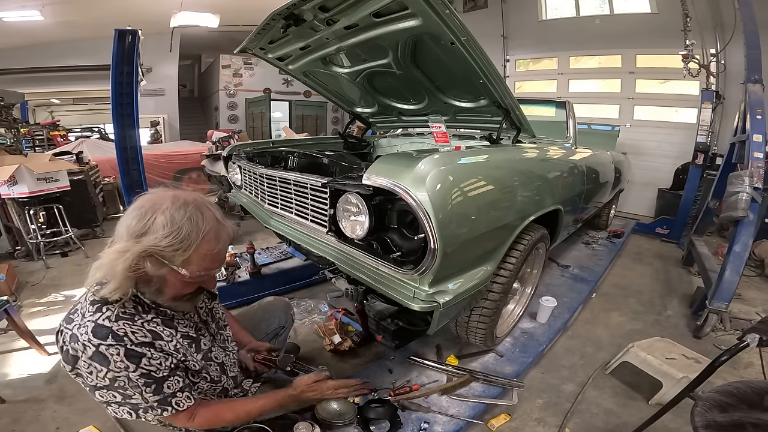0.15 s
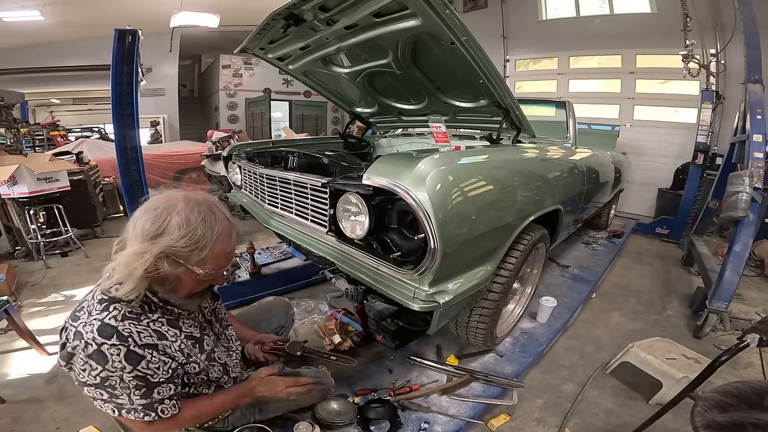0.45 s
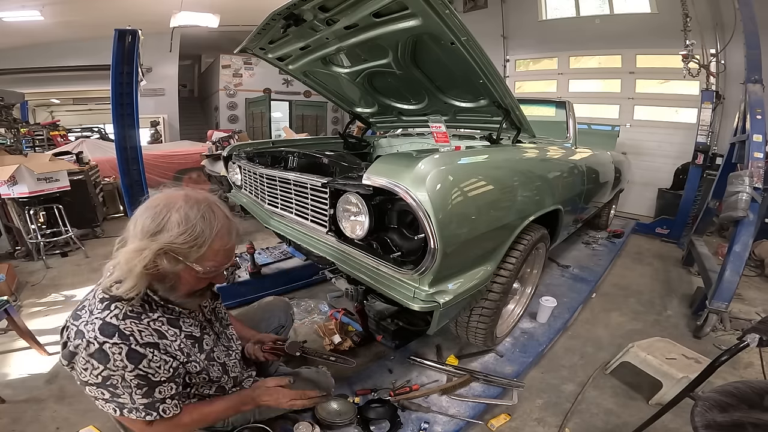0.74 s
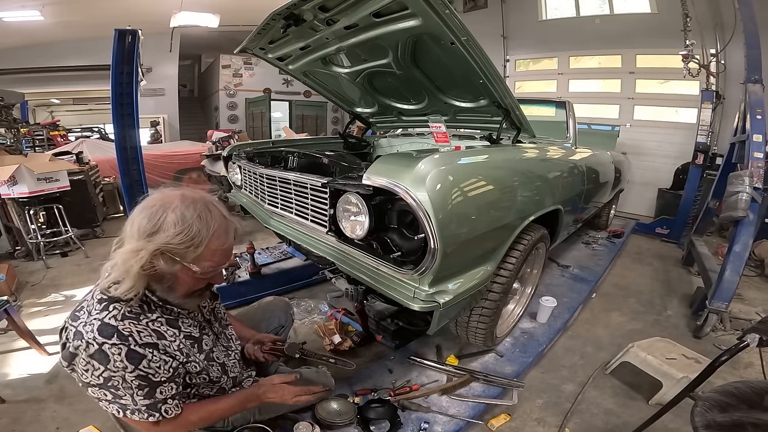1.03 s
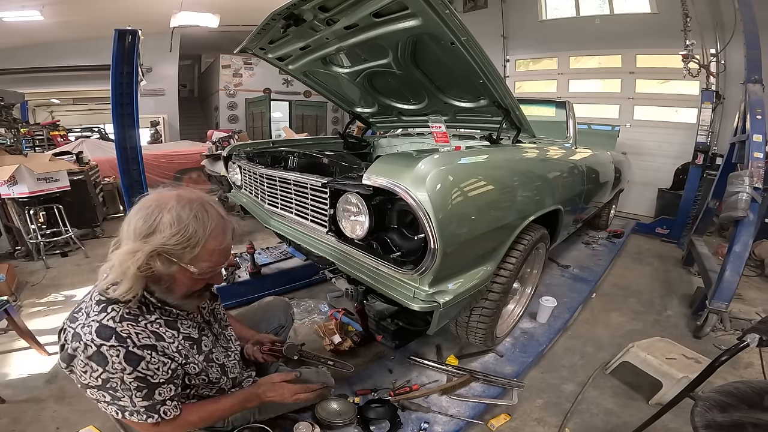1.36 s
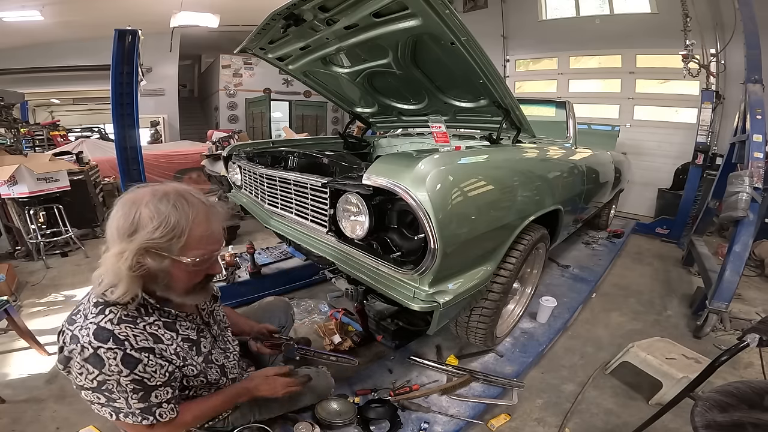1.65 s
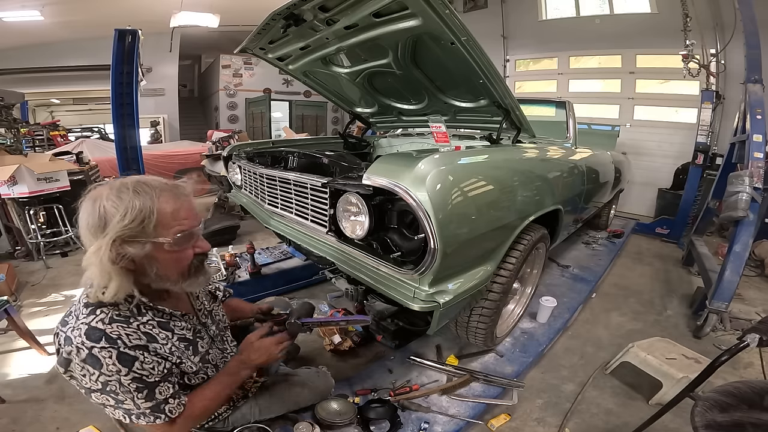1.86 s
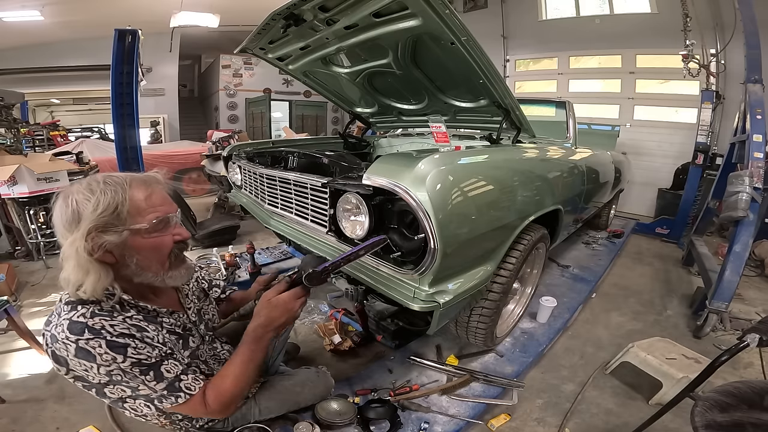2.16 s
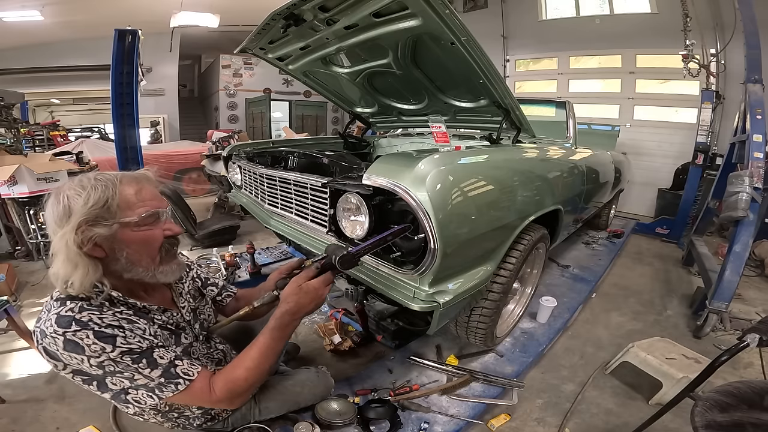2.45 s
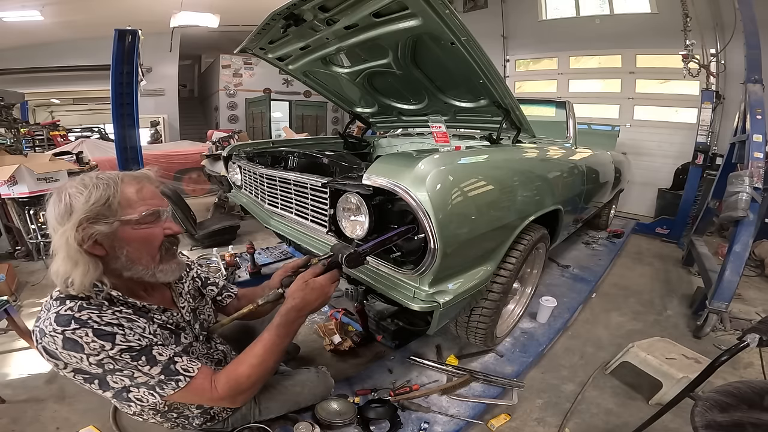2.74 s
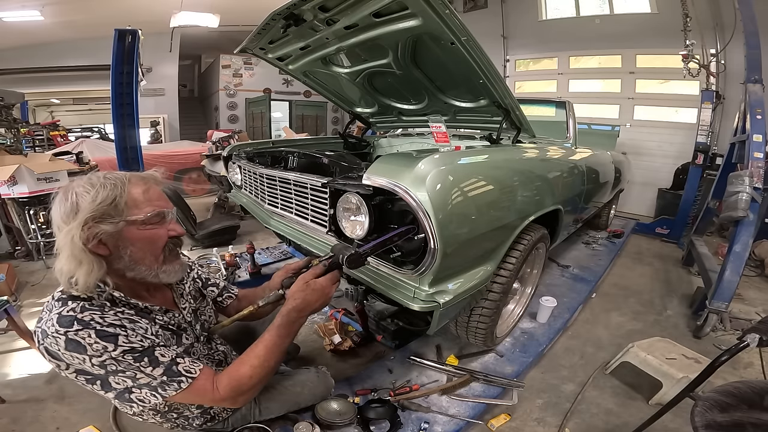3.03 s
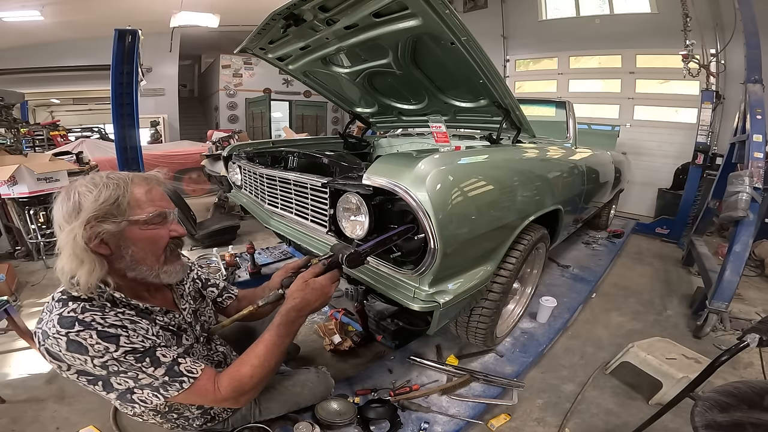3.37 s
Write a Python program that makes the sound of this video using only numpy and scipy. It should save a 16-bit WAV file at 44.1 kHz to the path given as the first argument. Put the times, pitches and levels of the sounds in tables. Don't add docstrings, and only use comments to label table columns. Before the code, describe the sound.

Air tool blipped in quick buzzing whines, a pause with thuds, then more bursts and a brief metallic scrape.

```python
import sys
import numpy as np
from scipy import signal
from scipy.fft import rfft, irfft, next_fast_len
from scipy.io import wavfile
from scipy.ndimage import map_coordinates

SR = 44100
rng = np.random.default_rng(int(sys.argv[2]) if len(sys.argv) > 2 else 0)


def dump_mix(stems):
    frames = np.atleast_2d(stems).T
    limited = np.clip(frames, -1, 1)
    pcm = np.round(limited * 32767).astype(np.int16)
    wavfile.write(sys.argv[1], SR, pcm)


def ratio(d):
    e = np.asarray(d, float) / 20
    return 10 ** e


N = 154350

# air starts in seconds, puffs start in seconds, valve shuts in seconds,
# puff level in dB, air level in dB.
SQUEEZES = [
    (0.62, 0.618, 0.78, -17.5, -30.5),
    (1.001, 1.007, 1.113, -19, -36),
    (1.182, 1.198, 1.32, -19, -34.5),
    (1.396, 1.398, 1.526, -19, -34),
    (2.963, 2.99, 3.124, -20, -31.5),
    (3.199, 3.192, 3.356, -20, -33.5),
    (3.447, 3.469, 3.83, -27.5, -38.5),
]


def unit(x):
    return x / np.sqrt(np.mean(x ** 2) + 1e-20)


def along(points, hz):
    f, v = np.transpose(points)
    return np.interp(np.log(hz + 1), np.log(f + 1), v)


def wobble(rate):
    return map_coordinates(rng.standard_normal(int(N * rate / SR) + 4), [np.arange(N) * rate / SR])


def filtered(x, response):
    m = next_fast_len(N + SR // 2)
    return irfft(rfft(x, m) * response(np.fft.rfftfreq(m, 1 / SR)), m)[..., :N]


def noise(spectrum):
    return unit(filtered(rng.standard_normal(N), lambda hz: ratio(along(spectrum, hz))))


def since(s):
    return np.maximum(np.arange(N) / SR - s, 0)


def resonances(table):
    def response(f):
        total = 0
        for k, (centre, width, db) in enumerate(table):
            damping = 1j * f * width
            total = total + (-1) ** k * ratio(db) * damping / (centre ** 2 - f * f + damping)
        return total
    return response


def dips(table):
    def response(f):
        cuts = [1 - depth * resonances([(centre, width, 0)])(f) for centre, width, depth in table]
        return np.prod(cuts, axis=0)
    return response


def hum():
    # frequency in Hz, level in dB.
    hum_tones = [
        (118.4, -58),
        (296.1, -69.5),
    ]
    t = np.arange(N) / SR
    return sum(ratio(db - 1.5 + 0.44 * wobble(7.64)) * np.sin(2 * np.pi * hz * t) for hz, db in hum_tones)


def room_air():
    # frequency in Hz, level in dB per Hz.
    air_spectrum = [(18, -59), (30, -33), (48, 7.5), (123, 1), (1190, -21), (2990, -23.5), (4880, -29.5),
                    (11700, -47), (14000, -45)]
    # time in seconds, level in dB.
    swell = [(0, -5.5), (.6, -5.5), (2.1, -3), (2.3, 1.5), (3.5, -1.5)]
    # centre in Hz, width in Hz, level in dB.
    whistles = [(1670, 200, 4.5), (3020, 67, 8.5), (3750, 150, 6.5), (6450, 120, -1.5)]
    level_db = -54 + np.interp(np.arange(N) / SR, *np.transpose(swell)) + 0.5 * wobble(6.7)
    return ratio(level_db) * filtered(noise(air_spectrum), lambda f: 1 + abs(resonances(whistles)(f)))


def fading_hiss():
    # frequency in Hz, level in dB per Hz.
    hiss_spectrum = [(88, -44), (150, -13), (275, -2.5), (467, -14.5), (532, -7), (2620, -4), (4220, -5.5),
                     (12000, -42), (15600, -59), (22000, -120)]
    level_db, t60_s = -41, 1.11
    return ratio(level_db - 60 * since(0) / t60_s + 1.3 * wobble(40.7)) * noise(hiss_spectrum)


def thuds():
    # start in seconds, low level in dB, scuff level in dB, body tone in Hz.
    knocks = [(0.231, -58, -50, 280), (0.294, -68, -48, 294), (2.586, -47, -48, 240),
              (2.611, -40.5, -70, 175), (2.687, -32.5, -53, 148.6), (2.699, -31, -50, 312.1),
              (2.712, -24.5, -47.5, 223), (2.753, -41.5, -56.5, 360), (2.761, -35, -54, 224.7),
              (2.813, -33.5, -55, 224), (2.87, -43, -57, 332.5), (2.932, -43.5, -57, 214.8)]
    # frequency in Hz, level in dB per Hz.
    rumble_spectrum = [(29, -51), (50, -2), (177, -16), (222, -0.5), (272, -17), (508, -16), (1000, -32.5),
                       (1300, -59), (2200, -120)]
    scuff_spectrum = [(180, -14), (300, -0.5), (499, -22), (684, -8.5), (3060, -16), (7000, -37),
                      (10400, -73), (17600, -120)]
    body_t60_s, rumble_t60_s, scuff_t60_s = 0.22, 0.53, 0.31
    rise_s = 0.0038
    out = np.zeros(N)
    for start, low_db, scuff_db, body_hz in knocks:
        t = since(start)
        body = ratio(6 - 60 * t / body_t60_s) * np.sin(2 * np.pi * body_hz * t)
        rumble = ratio(-3 - 60 * t / rumble_t60_s) * noise(rumble_spectrum)
        scuff = ratio(scuff_db - 60 * t / scuff_t60_s + 2.3 * wobble(80)) * noise(scuff_spectrum)
        out += ratio(low_db) * (body + rumble) * (1 - np.exp(-t / rise_s)) + scuff * (t > 0)
    return out


def scrape():
    # start in seconds, length in seconds, level in dB.
    touches = [
        (3.358, 0.03, -36.5),
        (3.44, .03, -29.5),
        (3.471, .05, -30.5),
    ]
    # frequency in Hz, width in Hz, level in dB.
    panel = [(2677, 26, -9), (3110, 49, -4), (3980, 38, -4), (4670, 34, 0.5), (5260, 14, 6.5),
             (5370, 23, 3), (6700, 38, -8.5), (7440, 54, -6), (8410, 55, -37), (11540, 60, -19),
             (12500, 80, -22)]
    rise_s, release_t60_s = 0.017, 0.077
    touch = np.zeros(N)
    for start, length, db in touches:
        release = ratio(-60 * since(start + length) / release_t60_s)
        touch += ratio(db) * np.clip(since(start) / rise_s, 0, 1) * release
    grit = rng.standard_normal(N) * ratio(4.7 * wobble(400))
    ringing = ratio(17.5) * filtered(touch * grit, resonances(panel))
    rasp = noise([(2000, -34), (5000, 9), (7800, -22.0), (9000, -14), (11000, -5), (14000, -27)])
    return ringing + ratio(-6.5) * touch * rasp


def valve():
    # time in seconds, crack level in dB, ring level in dB, knock level in dB.
    clicks = [(0.617, -30, -23, -32.5), (.637, -28, -53, -15.5), (.65, -22, -52, -15),
              (1.0, -28.5, -37, -28), (1.021, -25.5, -25, -18), (1.183, -25, -47, -27),
              (1.2, -29, -30, -18), (1.4095, -42, -35, -43), (2.968, -19, -22.5, -33.5),
              (2.991, -17, -36, -19.5), (3.001, -15.5, -40.5, -45), (3.017, -19.5, -48, -20.5),
              (3.195, -25, -40, -30), (3.3624, -24, -28, -36), (3.483, -21, -49, -29)]
    # frequency in Hz, level in dB per Hz.
    crack_spectrum = [(300, -15), (1000, 0), (2500, 2), (4200, -0.5), (9000, -48.5)]
    ring_hz, knock_hz = 2033, 270.4
    crack_t60_s, ring_t60_s, knock_t60_s = 0.026, 0.048, 0.065
    out = np.zeros(N)
    for start, crack_db, ring_db, knock_db in clicks:
        t = since(start)
        out += (t > 0) * ratio(crack_db - 60 * t / crack_t60_s) * noise(crack_spectrum)
        out += ratio(ring_db - 60 * t / ring_t60_s) * np.sin(2 * np.pi * ring_hz * t)
        out += ratio(knock_db - 60 * t / knock_t60_s) * np.sin(2 * np.pi * knock_hz * t)
    return out


def spin(start, closing, length, free_hz, lag):
    shut = since(closing) / length
    if length < 0.05:
        shut = (1.5 * shut) ** 3
    push = np.clip(since(start) / 0.01, 0, 1) * np.clip(1 - shut, 0, 1)
    keep = np.exp(-1 / (lag * SR))
    return signal.lfilter([1 - keep], [1, -keep], free_hz * push)


def vane_rate():
    # push starts in seconds, closing starts in seconds, closing time in seconds,
    # free vane rate in Hz, rotor lag in seconds.
    spins = [
        (0.6404, 0.7184, 0.057, 1093, 0.054),
        (1.01, 1.0887, 0.026, 644.2, 0.054),
        (1.1851, 1.2973, 0.0416, 637.6, 0.0518),
        (1.39, 1.504, 0.03, 613.5, 0.05),
        (2.9948, 3.1188, 0.03, 585.3, 0.038),
        (3.1883, 3.3459, 0.0344, 579.6, 0.0362),
        (3.2683, 3.3148, 0.04, 153.6, 0.032),
        (3.477, 3.6, 0.02, 609.5, 0.036),
    ]
    *pushes, deeper, last = [spin(*row) for row in spins]
    rate = np.max(pushes + [last], axis=0) + deeper
    return rate * (1 + 0.0048 * wobble(150))


def exhaust(rate, turn):
    # centre in Hz, width in Hz, level in dB.
    pipe_far = [(123, 65, -9), (296, 124, 3.5), (405, 168, 4), (592, 290, 0.5), (928, 88, 5),
                (1158, 203, -0.5), (1683, 196, 0), (2150, 160, -8), (2360, 136, -4.5), (3400, 750, -15)]
    pipe_near = [(126, 126, 0), (280, 140, 4.5), (404, 152, 5), (645, 156, 1), (876, 91, 4), (1120, 230, 0),
                 (1620, 320, 2), (2060, 150, -5), (2260, 140, 1), (2640, 380, -1), (3360, 660, -6.5),
                 (4100, 170, -4.5)]
    # centre in Hz, width in Hz, depth from 0 to 1.
    dips_far = [(360, 28.6, 0.82), (510, 32, 0.83), (773, 135, 0.78)]
    dips_near = [(320, 46, 0.59), (535, 86, 1), (720, 130, 0.51)]
    # frequency in Hz, width in Hz, level in dB.
    shell = [(861, 9.3, -3), (1660, 12, -19)]
    # time in seconds, level in dB, half length in seconds.
    chuffs = [
        (.772, 1.5, 0.0064),
        (0.789, 7.5, 0.0054),
        (1.13, 3, .012),
        (1.328, 4, 0.0072),
        (1.527, 4, 0.0062),
        (3.141, 10, 0.0088),
        (3.368, 11, .005),
        (3.378, 12.5, 0.0058),
    ]
    rise_s, coast_t60_s, moved_s = 0.025, 0.17, 2.2
    t = np.arange(N) / SR
    flow = np.zeros(N)
    for _, start, shut, db, _ in SQUEEZES:
        flow += ratio(db - 60 * since(shut) / coast_t60_s) * np.clip(since(start) / rise_s, 0, 1)
    bark_db = sum(db * np.exp(-((t - s) / half) ** 2) for s, db, half in chuffs)

    train = np.zeros(N)
    for k in range(1, 30):
        order_db = -4.5 * np.log2(k) + 2.5 * (k == 2) + 2.5 * wobble(45)
        if k > 1:
            order_db = order_db + bark_db
        else:
            order_db = order_db - 0.96 * bark_db * (t < moved_s)
        fade_at_top = np.clip(8 - k * rate / 1000, 0, 1)
        train += ratio(order_db) * np.cos(2 * np.pi * k * turn) * fade_at_top
    train *= np.clip(rate / 150, 0, 1)

    puff_size = ratio(rng.standard_normal(4000))[(turn + 0.5).astype(int)]
    puffs = ratio(1) * flow * puff_size * train

    def muffler(pipe, echo):
        return lambda f: resonances(pipe)(f) * dips(echo)(f) + resonances(shell)(f)

    before = filtered(puffs * (t < moved_s), muffler(pipe_far, dips_far))
    after = filtered(puffs * (t >= moved_s), muffler(pipe_near, dips_near))
    return before + after


def air_rush(turn):
    # frequency in Hz, level in dB per Hz.
    rush_spectrum = [(300, -4), (900, -10), (2000, -3.5), (3000, -12.5), (4200, -5.5), (4600, -13.5),
                     (7800, -21), (9000, -66)]
    fizz_spectrum = [(4710, -18), (8000, -9), (9050, -5.5), (10100, -4), (11900, -6.5), (14300, -23)]
    # centre in Hz, width in Hz, level in dB.
    housing = [(850, 41, 2), (1680, 95, -10), (2034, 80, 7), (2300, 230, -1), (2450, 42, 15),
               (3060, 180, 6), (3580, 40, 9.5), (3830, 190, -4.5), (4160, 54, -3.5), (5020, 160, 4)]
    rise_s, t60_s, sag_db_per_s = 0.019, 0.32, 9.5
    flow = np.zeros(N)
    for start, _, shut, _, db in SQUEEZES:
        level_db = db - 60 * since(shut) / t60_s - sag_db_per_s * since(start)
        flow += ratio(level_db) * np.clip(since(start) / rise_s, 0, 1)
    chopped = flow * (1 + 0.11 * np.cos(2 * np.pi * turn)) * ratio(2.5 * wobble(60))
    rush = filtered(noise(rush_spectrum), lambda f: 1 + abs(resonances(housing)(f)))
    return chopped * (ratio(-1) * rush + ratio(-20) * noise(fizz_spectrum))


def motor():
    rate = vane_rate()
    turn = np.cumsum(rate) / SR
    return exhaust(rate, turn) + air_rush(turn)


def shop(x):
    # frequency in Hz, decay time T60 in seconds.
    hall_t60 = [(100, 0.58), (500, 1.17), (1000, 1.006), (3000, 1.005), (8000, 0.77), (13000, 0.61)]
    delay_s = 0.012
    hz, t, z = signal.stft(rng.standard_normal(SR * 3 // 2), SR, nperseg=256)
    decay = ratio(-60 * t / along(hall_t60, hz)[:, None])
    tail = signal.istft(z * decay, SR, nperseg=256)[1]
    delayed = np.pad(x, (round(delay_s * SR), 0))
    return signal.fftconvolve(delayed, tail / np.linalg.norm(tail))[:N]


def scene():
    # frequency in Hz, level in dB.
    side_level = [(60, -27), (370, -44), (1400, -43), (2800, -34), (5600, -29), (9000, -27), (11000, -9),
                  (12500, 1), (14000, 3)]
    near = thuds() + scrape() + valve() + motor()
    mid = hum() + room_air() + fading_hiss() + near + ratio(-11) * shop(near)
    scatter = rng.standard_normal(8000) * np.exp(-np.arange(8000) / 1500)
    scattered = signal.fftconvolve(mid, scatter / np.linalg.norm(scatter))[:N]
    side = filtered(scattered, lambda hz: ratio(along(side_level, hz)))
    return np.array([mid + side, mid - side])


def roll_off(x):
    return signal.sosfilt(signal.butter(12, 14970, fs=SR, output="sos"), x)


def record(dry):
    # frequency in Hz, level in dB.
    left_tilt = [(9000, 0), (12500, -3)]
    low_cut_hz, top_hz = 90.5, 14950
    notch_hz, notch_width_hz = 9160, 790
    clip_top, hardness = 0.49, 5
    clipped = dry / (1 + abs(dry / clip_top) ** hardness) ** (1 / hardness)

    def overall_colour(f):
        low_cut = (1j * f / (low_cut_hz + 1j * f)) ** 3
        off_notch = notch_hz ** 2 - f * f
        notch = off_notch / (off_notch + 1j * f * notch_width_hz)
        channels = ratio(np.outer([0.5, -0.5], along(left_tilt, f)))
        return low_cut * notch * (f < top_hz) * channels

    return roll_off(filtered(clipped, overall_colour))


dry = scene()
out = record(dry)
dump_mix(out)
```